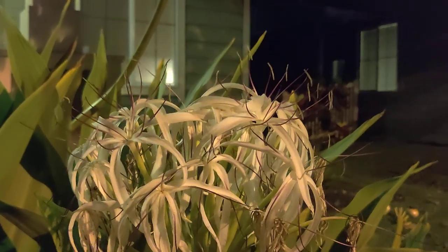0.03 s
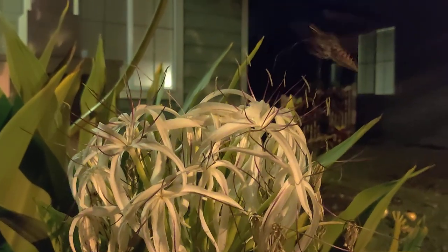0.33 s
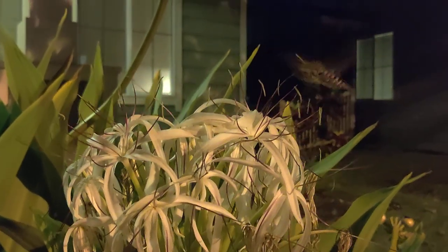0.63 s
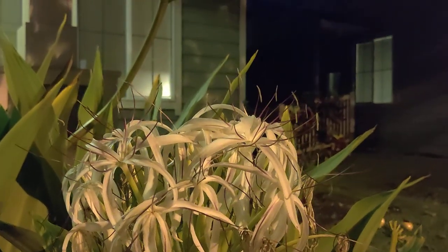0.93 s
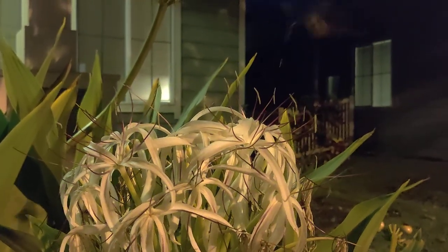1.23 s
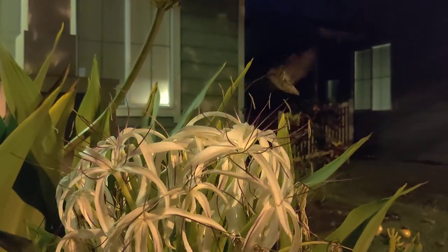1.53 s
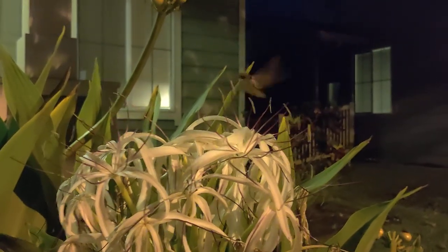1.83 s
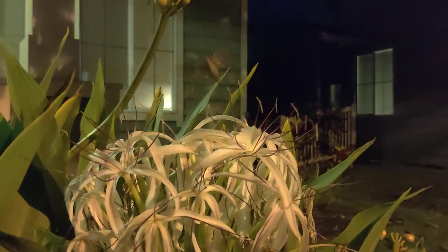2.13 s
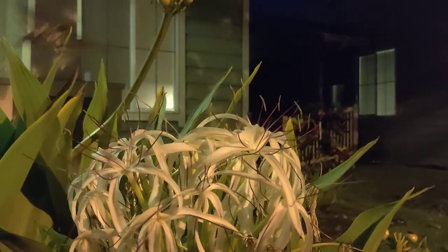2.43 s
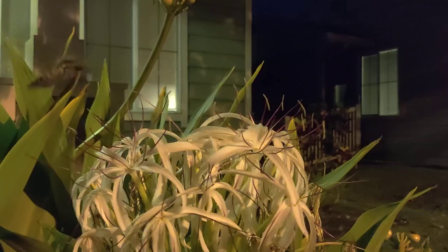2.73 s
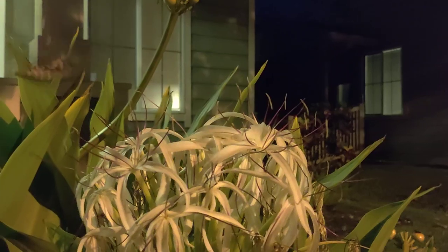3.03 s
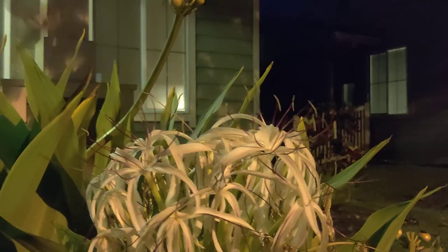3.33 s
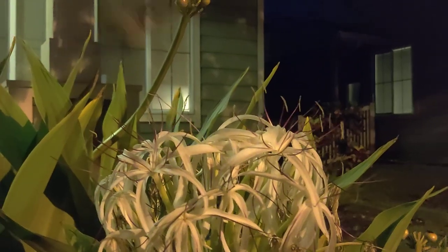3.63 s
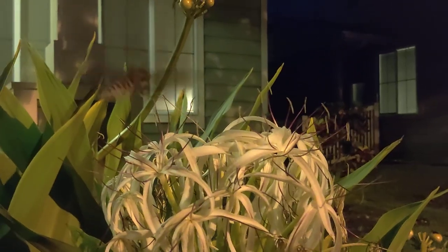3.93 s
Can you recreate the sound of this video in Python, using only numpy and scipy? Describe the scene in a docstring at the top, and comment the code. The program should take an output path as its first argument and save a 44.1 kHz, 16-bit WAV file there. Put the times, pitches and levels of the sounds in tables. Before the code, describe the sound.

Crickets chirp softly throughout in a night garden, the nearest to the right of the microphones, echoing off house walls. Beneath are distant traffic rumble, hiss and a motor hum; a faint squeak comes early, then two far-off blips.

```python
"""A garden at night, heard on a pair of microphones. Distant traffic rumbles, swells and fades
under a steady hiss, and a motor hums somewhere. Close on the right a cricket chirps in short runs,
one pulse to each closing of its wings, echoing off the house walls, with fainter crickets behind it.
Once there is a faint, thin squeak, and later two far-off blips."""
import sys
import numpy as np
from scipy import signal
from scipy.fft import rfft, irfft
from scipy.io import wavfile

SR = 44100
rng = np.random.default_rng(int(sys.argv[2]) if len(sys.argv) > 2 else 0)


def waveform_to_disk(signal):
    """Save audio, clipped to [-1, 1], as 16-bit WAV at the path in sys.argv[1]."""
    frames = np.transpose(np.atleast_2d(signal))
    scaled = np.clip(frames, -1, 1) * 32767
    samples = np.round(scaled).astype(np.int16)
    wavfile.write(sys.argv[1], SR, samples)


N = 176400
TIME = np.arange(N) / SR
FREQS = np.maximum(np.arange(N // 2 + 1) * SR / N, 1)


def from_db(db):
    """Decibels to gain."""
    return 10 ** (np.asarray(db) / 20)


def unit_rms(x):
    """Scale to unit power."""
    return x / np.sqrt(np.mean(x ** 2) + 1e-30)


def over_hz(rows):
    """Each column after a table's first, interpolated over log frequency."""
    hz, *columns = np.transpose(rows)
    return [np.interp(np.log(FREQS), np.log(hz), column) for column in columns]


def pan(db):
    """Constant-power gains for left minus right in dB: negative is to the right."""
    gains = np.vstack([from_db(db / 2), from_db(-db / 2)])
    return gains / np.sqrt(np.mean(gains ** 2, axis=0))


def bell(x, centre, spread):
    """A smooth Gaussian rise and fall."""
    return np.exp(-.5 * ((x - centre) / spread) ** 2)


def drift(rate_hz):
    """A random wander of unit power, mostly slower than rate_hz."""
    return unit_rms(irfft(rfft(rng.standard_normal(N)) * bell(FREQS, 0, rate_hz), N))


# The open air at the two microphones. Each row: frequency in Hz, left-right likeness from 0 to 1,
# left minus right in dB.
MIC_PAIR = [(40.2, 0.98, -1), (126, 1, -1), (258, 1, -1.1), (478, 0.55, -1), (1140, 0.24, -1.5),
            (2860, 0.02, -3.5), (5200, 0.03, -4.5), (6900, 0, -5), (8000, 0.34, 0.5)]
def air_noise(gain, right_lag_s=0.000418):
    """Noise from all around with the given spectrum: alike in the bass, mostly unrelated higher up."""
    alike, balance_db = over_hz(MIC_PAIR)
    alike = np.clip(alike, -.99, .995)
    mid, side = rfft(rng.standard_normal((2, N)))
    both = np.sqrt((1 + alike) / 2) * mid + np.sqrt((1 - alike) / 2) * side * [[1], [-1]]
    lag = np.exp(-2j * np.pi * FREQS * right_lag_s * np.array([[0], [1]]))
    return irfft(both * lag * gain * pan(balance_db), N) * np.sqrt(SR / 2)


# Night hiss all round the garden. Each row: frequency in Hz, level in dB per Hz.
HISS_SPECTRUM = [(400, -112), (1000, -102), (1550, -102.5), (2300, -103.5), (3300, -106.5), (5200, -109),
                 (6700, -109.5)]
def night_hiss():
    """An even bed of broad noise."""
    return air_noise(from_db(over_hz(HISS_SPECTRUM)[0]))


# The town in the distance. Each row: frequency in Hz, level in dB per Hz before the gain below.
RUMBLE_SPECTRUM = [(10, -91.5), (19, -57), (25, -68), (36, -60.5), (48, -59.5), (57, -67.5), (70, -61),
                   (88, -74.5), (160, -72.5), (250, -80.5), (400, -85), (650, -86), (1000, -94),
                   (2000, -114)]
# Its slow rise and fall. Each row: time in seconds, gain in dB.
RUMBLE_GAIN = [(0, -2.5), (.3, -2.5), (.55, -4), (.8, -2.5), (1.5, -3.5), (2.1, -2.5), (2.7, -4.5),
               (3.4, -4), (4, -4)]
# Its throbs, the same at both microphones. Each row: peak time and spread in seconds, pitch in Hz,
# level in dB.
RUMBLE_THROBS = [(.98, .05, 35, -46), (1.33, .08, 165, -51), (1.47, .045, 35, -46), (1.53, .06, 187, -50.5),
                 (2.85, .04, 40, -43), (3.38, .055, 39, -45)]
def town_rumble():
    """Deep, gently wavering noise with brief low tones swelling inside it."""
    gain = from_db(np.interp(TIME, *np.transpose(RUMBLE_GAIN)))
    rumble = gain * air_noise(from_db(over_hz(RUMBLE_SPECTRUM)[0]))
    for peak_s, spread_s, hz, db in RUMBLE_THROBS:
        tone = np.sin(2 * np.pi * (hz * TIME + rng.random()))
        rumble += from_db(db) * bell(TIME, peak_s, spread_s) * tone
    return rumble


# A motor somewhere out of sight. Each row: centre in Hz, width in Hz, level in dB.
MOTOR_BANDS = [(114, 14, -57.5), (300, 12, -73), (368, 10, -73.5), (415, 8, -76), (2331, 14, -91),
               (3850, 8, -95), (4134, 14, -94)]
def motor_hum():
    """Narrow, steady bands of noise: low hums and thin whines."""
    return sum(from_db(db) * unit_rms(air_noise(bell(FREQS, hz, width_hz / 2)))
               for hz, width_hz, db in MOTOR_BANDS)


def swell(peak_s, spread_s, hz, octaves, db):
    """One band of far-off noise grows and fades."""
    band = unit_rms(air_noise(bell(np.log2(FREQS / hz), 0, octaves)))
    return from_db(db) * bell(TIME, peak_s, spread_s) * band


# Traffic far from the garden. Each row: peak time and spread in seconds, centre in Hz,
# spread in octaves, level in dB.
TRAFFIC_SWELLS = [(0.47, 0.11, 208, 0.1, -59), (1.3, 0.18, 180, 0.2, -56.5),
                  (1.463, 0.49, 125, 0.76, -50.5), (1.887, 0.23, 340, 0.45, -57.5),
                  (1.28, 0.34, 500, 0.27, -65), (1.7, 0.5, 67.6, 0.072, -52.5),
                  (0.822, 0.091, 67.4, 0.11, -49.5), (1.05, 0.37, 119, 0.17, -55.5),
                  (2.38, 0.28, 160.7, .11, -56.5)]
def distant_traffic():
    """Low drones and tyre noise come and go in overlapping swells."""
    return sum(swell(*row) for row in TRAFFIC_SWELLS)


# Two blips a long way off. Each row: peak time and spread in seconds, centre in Hz,
# spread in octaves, level in dB.
FAR_BLIPS = [(2.02, .025, 2170, .08, -75), (2.168, .018, 2200, .07, -72.5)]
def far_blips():
    """Faint, brief swells of noise, narrow enough to have a pitch."""
    return sum(swell(*row) for row in FAR_BLIPS)


# A faint squeak, right of centre. Each row: pitch in Hz, level in dB, fade time in seconds.
SQUEAK_PARTIALS = [(2632, -73, .145), (3990, -78, .07), (5535, -76.5, .038), (7290, -76.5, .075)]
def squeak(start_s=.803, attack_s=.022, wobble_hz=10, roughness=.42):
    """Thin, wobbling partials come in together, hold and die away; the lowest lasts longest."""
    t = np.maximum(TIME - start_s, 0)
    tone = np.zeros(N)
    for hz, db, fade_s in SQUEAK_PARTIALS:
        hold = np.exp(-(t / fade_s) ** 4)
        cycles = np.cumsum(hz + wobble_hz * drift(rate_hz=150)) / SR
        flutter = 1 + roughness * drift(rate_hz=78)
        tone += from_db(db) * hold * flutter * np.sin(2 * np.pi * cycles)
    return tone * np.minimum(t / attack_s, 1) * pan(db=-7)


def garden_echoes(sound, t60_s, wall_delay_s=.004):
    """Scatter from walls and plants, different at each microphone and as strong as the sound itself."""
    t = TIME[:SR // 2]
    response = rng.standard_normal((2, len(t))) * from_db(-60 * t / t60_s) * (t > wall_delay_s)
    echoes = signal.fftconvolve(sound[None], response, axes=1)[:, :N]
    return echoes / echoes.std(axis=1, keepdims=True) * sound.std()


def wing_strokes(chirps, period_s=.063, stroke_s=.04, flutter=.5):
    """Each closing of a cricket's wings gives one short, fluttering tone that tends to lift in pitch."""
    song = np.zeros(N)
    for first_s, pulses, db, step_db, hz in chirps:
        for k in range(int(round(pulses))):
            t = TIME - first_s - k * period_s
            sounding = np.abs(t) < stroke_s / 2
            t = t[sounding]
            envelope = from_db(db + k * step_db) * np.cos(np.pi * t / stroke_s) ** 2
            rise_hz_per_s = rng.normal(1800, 2200)
            cycles = hz * t + rise_hz_per_s * t * t / 2 + rng.random()
            song[sounding] += envelope * np.sin(2 * np.pi * cycles)
    return song * (1 + flutter * drift(rate_hz=87))


# Crickets far from the microphones, right of centre. Each row: pitch in Hz, mean time between chirps
# in seconds, level in dB.
FAR_SINGERS = [(5600, 0.26, -81.5), (5630, .27, -83.5), (5930, 0.29, -79), (5960, 0.14, -81.5),
               (5860, 0.28, -81.5)]
def far_crickets(pulses=4, chorus_hz=5810, chorus_spread_hz=125, chorus_db=-83):
    """Each chirps loosely in its own time and is heard only by its echoes, over an unbroken chorus."""
    chirps = []
    for hz, period_s, db in FAR_SINGERS:
        for k in range(int(N / SR / period_s) + 1):
            first_s = period_s * (k + rng.uniform(-.54, .5))
            chirps.append((first_s, pulses, db, 0, hz + rng.normal(0, 35)))
    chorus = from_db(chorus_db) * unit_rms(air_noise(bell(FREQS, chorus_hz, chorus_spread_hz)))
    return garden_echoes(wing_strokes(chirps), t60_s=.7) * pan(db=-6.5) + chorus


# The cricket close by on the right. Each row: peak of the first pulse in seconds, number of pulses,
# level in dB before the song's gain, change per pulse in dB, pitch in Hz.
NEAR_CHIRPS = [(.112, 3, -67, .5, 5950), (.512, 2, -75, 8, 5930), (.887, 3, -68, 1.7, 5960),
               (1.285, 3, -76, 0, 5950), (1.560, 3, -69, 0, 5980), (1.950, 3, -65.5, -4, 5960),
               (2.222, 4, -68.5, -1.5, 5985), (2.322, 3, -66, -4, 5930), (2.722, 3, -66, 0, 5930),
               (2.850, 2, -76, 2, 6010), (3.147, 2, -71, 2, 5840), (3.237, 2, -65, -8, 5960),
               (3.365, 1, -68.5, 0, 5985), (3.506, 2, -72, 3, 5840), (3.738, 2, -72.5, 0, 5990),
               (3.936, 2, -68, -1, 5950)]
# Crickets behind it, further off and lower in pitch. Each row reads as above.
CHIRPS_BEHIND = [(.315, 3, -75, -1, 5640), (.5, 2, -75, 1, 5810), (1.045, 2, -77, 0, 5730),
                 (1.43, 2, -76, 0, 5700), (1.59, 2, -74, -1, 5870), (1.98, 2, -70, -3, 5900),
                 (2.295, 2, -72, 0, 5850), (2.51, 1, -77, 0, 5660), (3.0, 2, -76, -2, 5670),
                 (3.575, 2, -78, 1, 5660)]
def near_crickets(gain_db=1.3, echo_db=-2.5):
    """The song arrives straight from the right; its echoes off the house walls spread wider."""
    song = from_db(gain_db) * wing_strokes(NEAR_CHIRPS + CHIRPS_BEHIND)
    echoes = from_db(echo_db) * garden_echoes(song, t60_s=.25)
    return song * pan(db=-26) + echoes * pan(db=-12)


def scene():
    """Everything that reaches the microphones in the garden."""
    background = town_rumble() + motor_hum() + night_hiss() + distant_traffic() + far_blips()
    return background + near_crickets() + far_crickets() + squeak()


# The recorder's treble loss, on both microphones. Each row: frequency in Hz, gain in dB.
TREBLE_LOSS = [(6900, 0), (7800, -3), (8400, -7), (8900, -16), (9600, -18), (12500, -18.5)]
def record(dry, cutoff_hz=12600):
    """The recorder dulls the treble, then cuts it steeply."""
    dulled = irfft(rfft(dry) * from_db(over_hz(TREBLE_LOSS)[0]), N)
    lowpass = signal.ellip(10, .1, 80, cutoff_hz, fs=SR, output="sos")
    return signal.sosfilt(lowpass, dulled)


dry = scene()
out = record(dry)
waveform_to_disk(out)
```